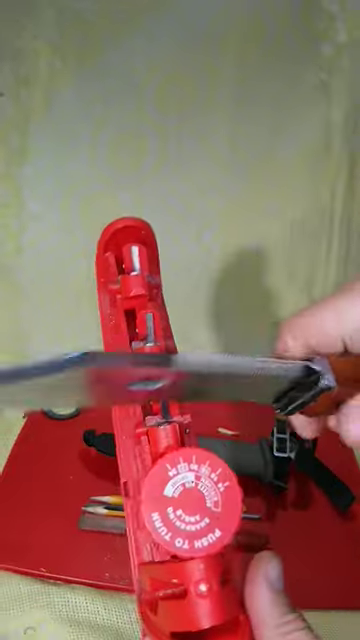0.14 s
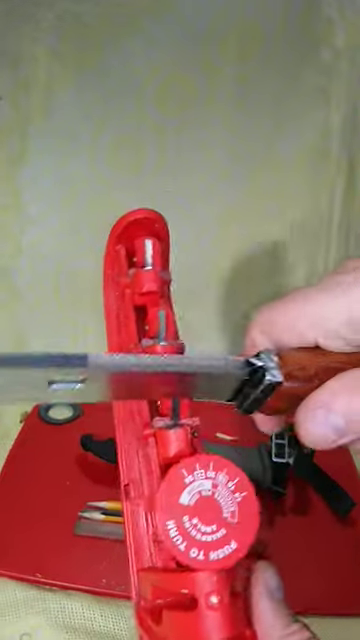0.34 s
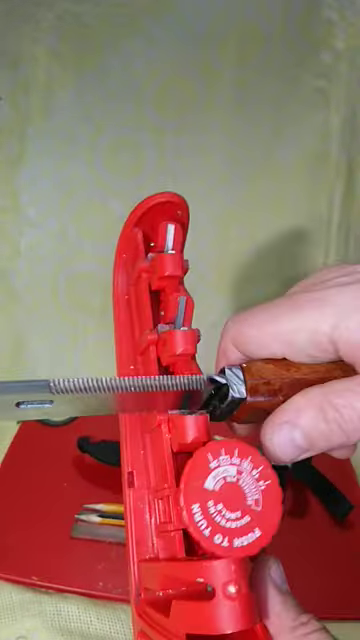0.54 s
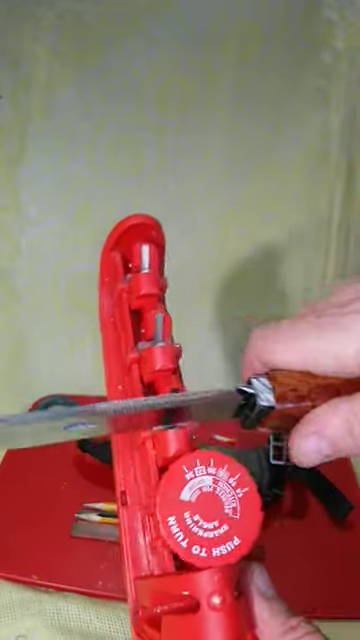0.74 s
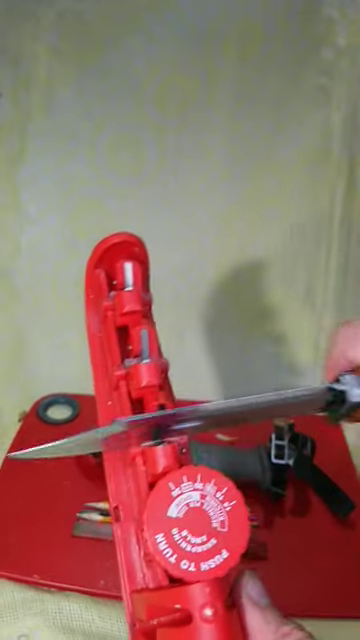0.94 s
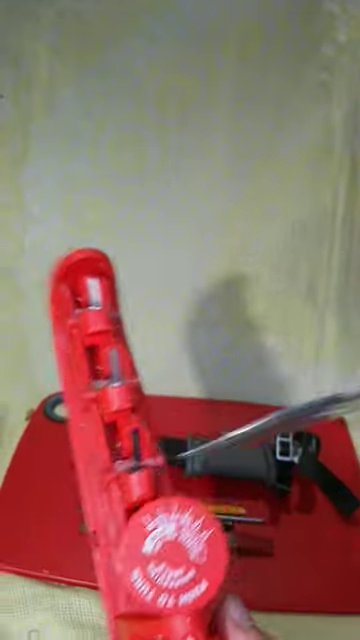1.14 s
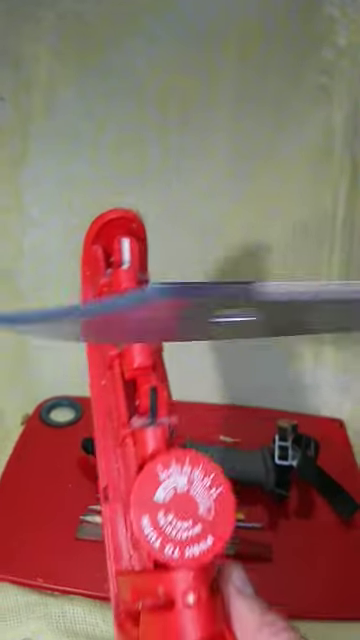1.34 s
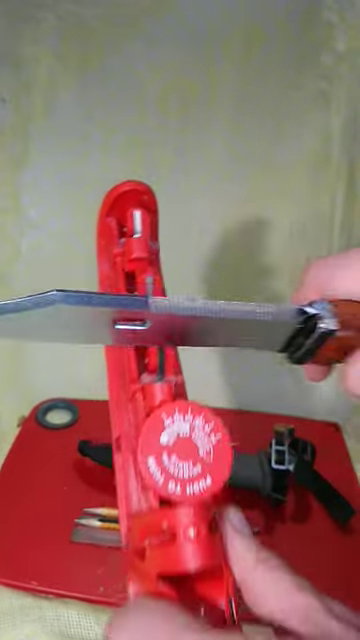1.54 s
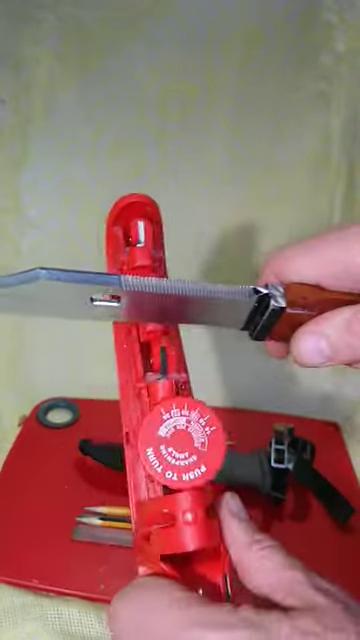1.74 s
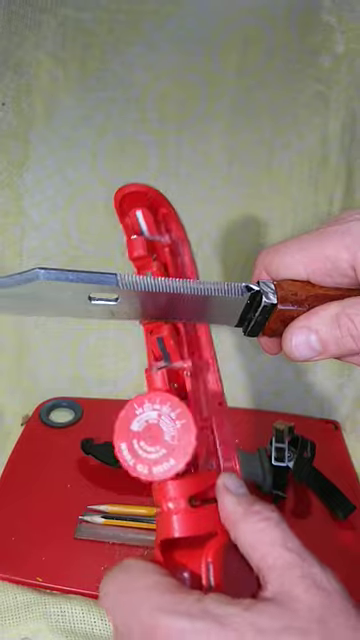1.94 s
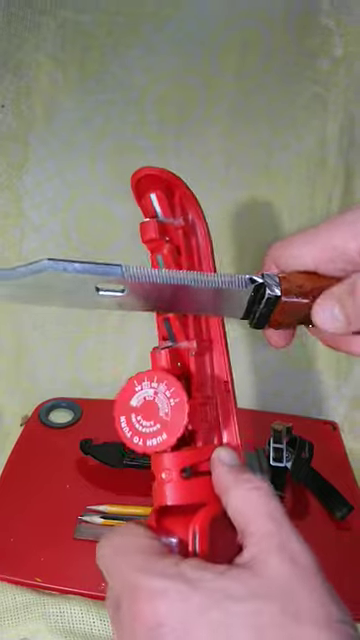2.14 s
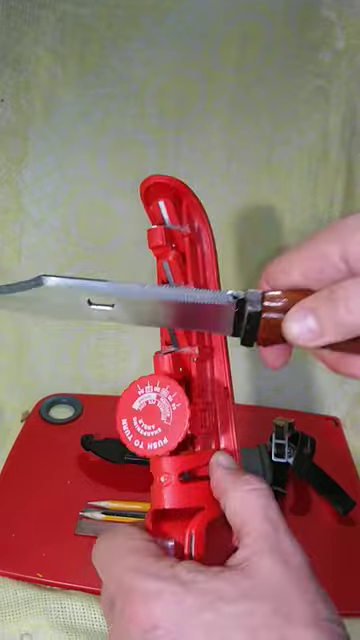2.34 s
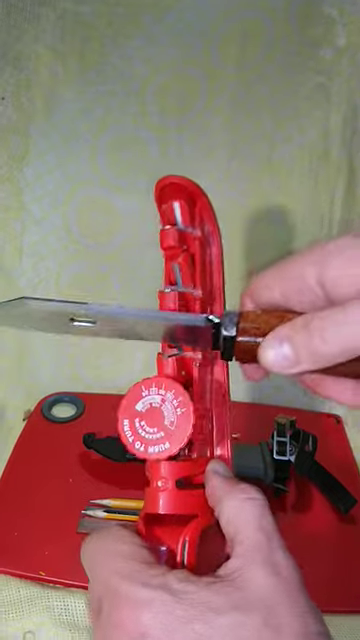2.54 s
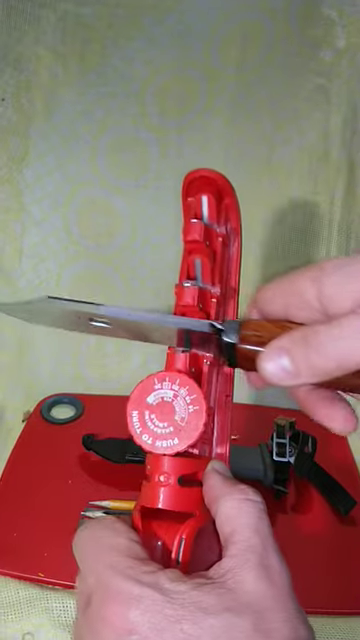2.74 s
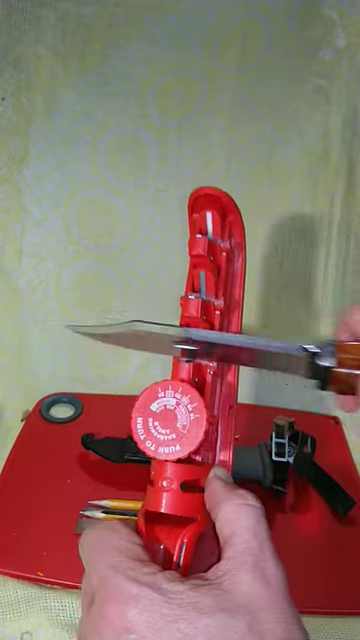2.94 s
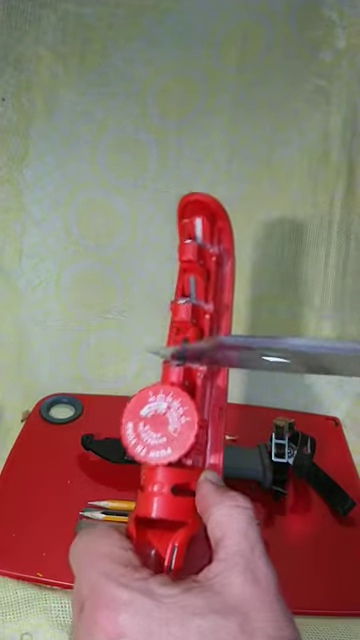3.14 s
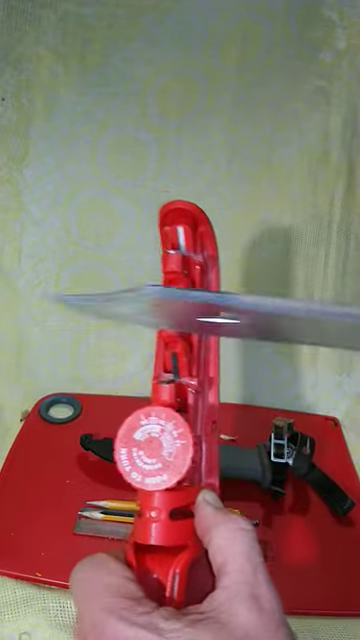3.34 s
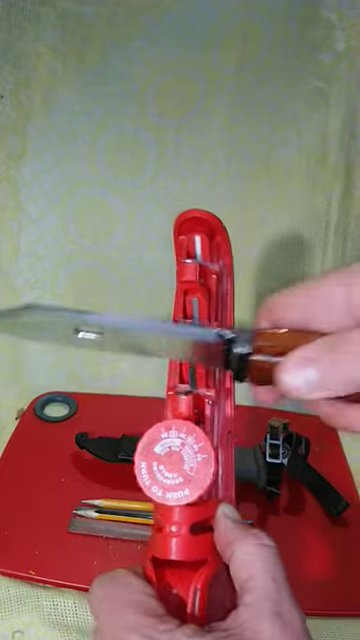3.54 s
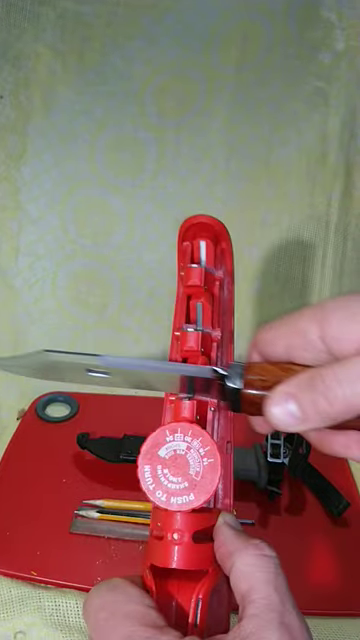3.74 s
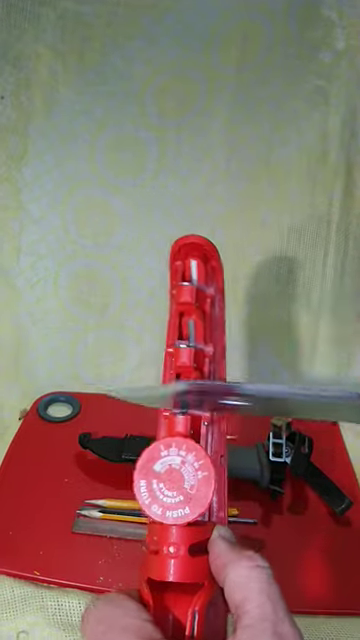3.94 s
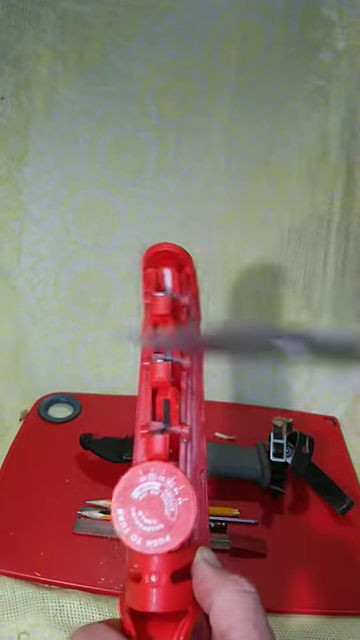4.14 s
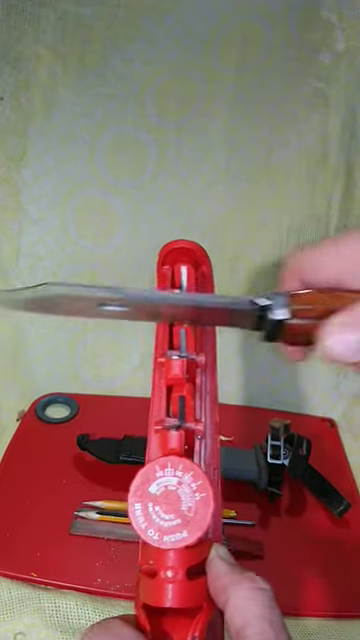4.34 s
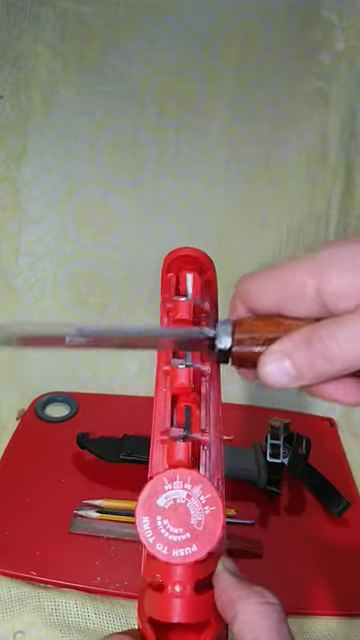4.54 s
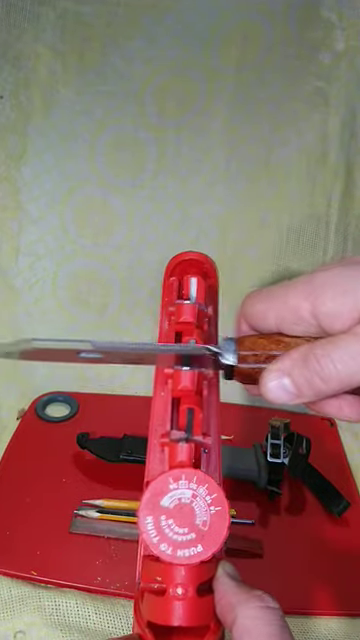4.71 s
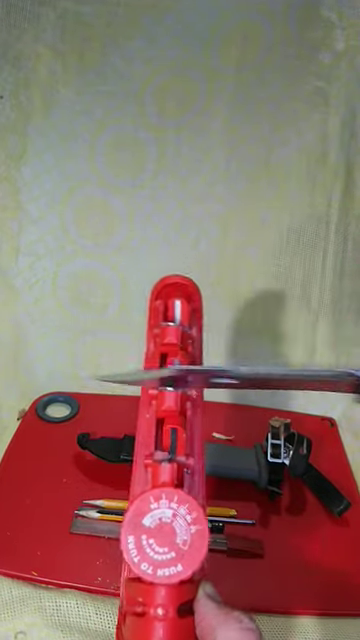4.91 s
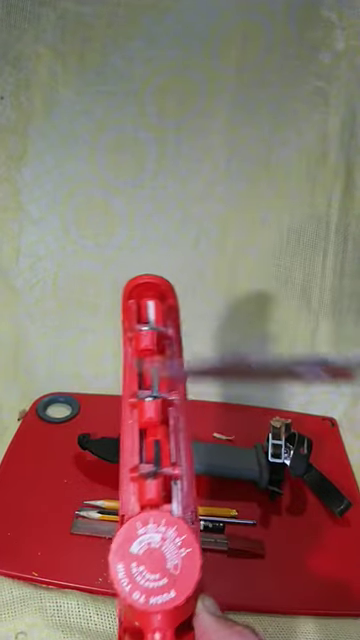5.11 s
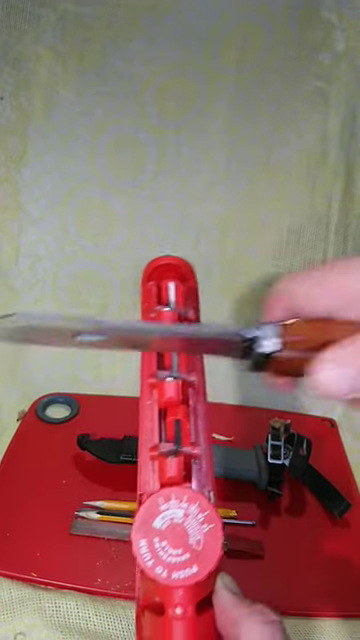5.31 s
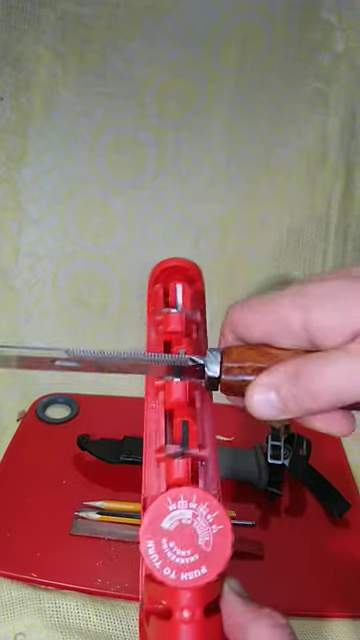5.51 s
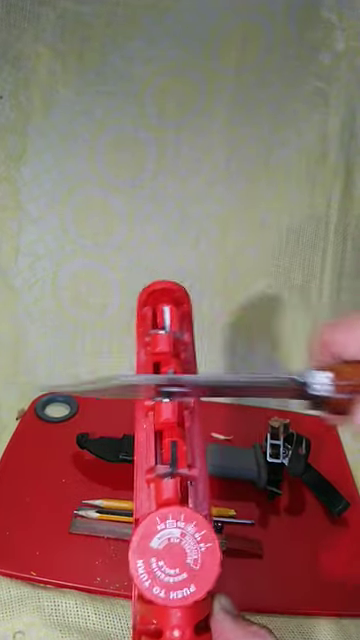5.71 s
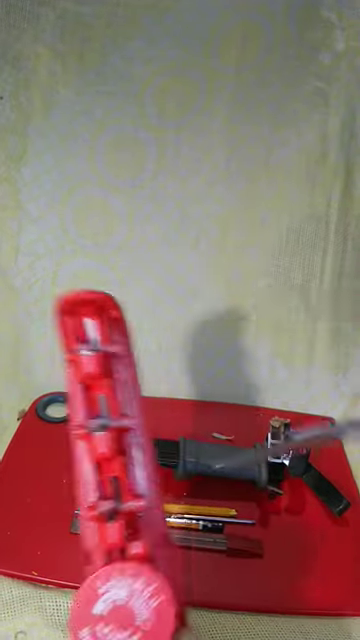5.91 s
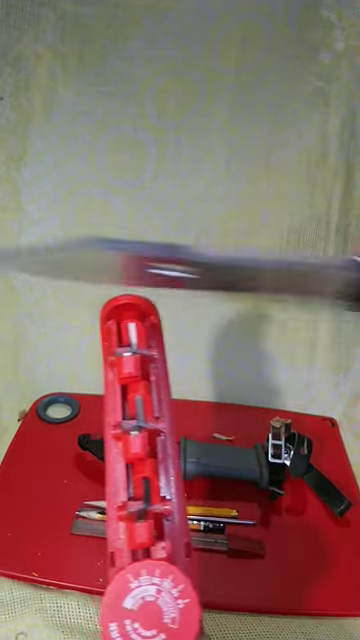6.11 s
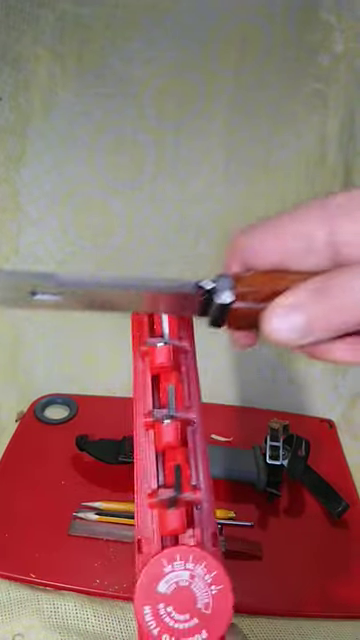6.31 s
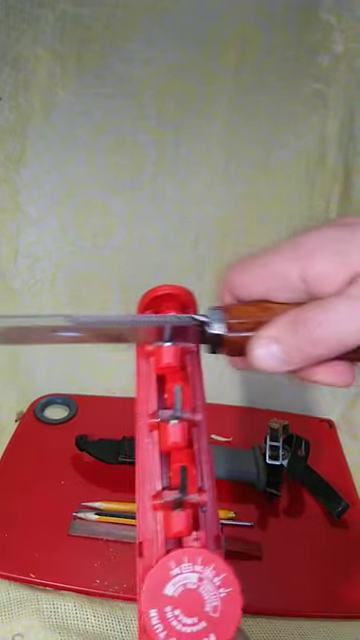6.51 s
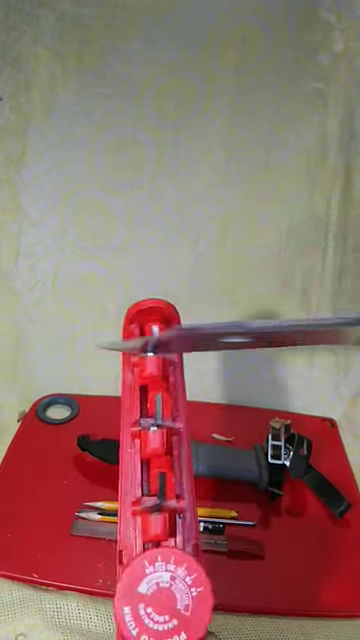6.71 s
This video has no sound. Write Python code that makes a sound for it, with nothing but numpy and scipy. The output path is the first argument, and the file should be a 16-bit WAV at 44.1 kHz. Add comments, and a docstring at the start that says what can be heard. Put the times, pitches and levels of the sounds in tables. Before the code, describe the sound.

A steel blade is pulled six times through a plastic sharpener, each stroke a bright knock then a short gritty rasp, in a quiet small room.

```python
'''A small room: over a table, a steel knife is pulled six times through a hand-held plastic sharpener.
Each time the blade knocks into a slot (crack and thud), then rasps under growing pressure: grainy noise
drives resonances of blade and housing. The edge catches with short squeaks; after four pulls the freed
blade rings faintly. Rattles, taps, rumbles, hum, air noise and a soft tick about once a second lie beneath.
Two microphone ports colour the contact sounds differently on left and right.'''
import sys
import numpy as np
from scipy import signal
from scipy.fft import rfft, irfft, next_fast_len
from scipy.io import wavfile
from scipy.ndimage import uniform_filter1d

SR = 44100
rng = np.random.default_rng(int(sys.argv[2]) if len(sys.argv) > 2 else 0)


def wav_record(signal):
    """Record a signal, one row per channel, as 16-bit PCM in the file named by sys.argv[1]."""
    frames = np.transpose(np.atleast_2d(signal))
    bounded = np.clip(frames, -1, 1)
    # unit amplitude maps onto the largest positive 16-bit level
    quanta = np.round(bounded * 32767).astype(np.int16)
    wavfile.write(sys.argv[1], SR, quanta)


N = 298116
TIME = np.arange(N) / SR

# pulls: (full bite t/s, tip reached t/s, attack/s, tip length/s, heel level/dB, near-tip level/dB,
#         chatter re rasp/dB, hiss re rasp before trim/dB)
PULLS = [ (0.705, 1.131, 0.053, 0.064, -38, -31.5, -10.5, -1),
         (2.809, 3.199, 0.03, 0.046, -37.5, -33.5, -9, -6),
         (3.794, 4.072, 0.064, 0.035, -42, -32, -3, -2.5), (4.761, 5.07, 0.022, 0.011, -39, -32, -1, -1),
         (5.66, 5.906, 0.011, 0.034, -39.5, -33.5, -4, -3.5),
         (6.559, 6.758, 0.017, .04, -39, -36, -1.5, -5), ]
# hand leans in or eases off, one row per pull: (t/s, pressure change/dB, length/s)
LEANS = [(0.816, -3.5, 0.024), (2.932, 3.5, 0.056), (3.887, 9, 0.062), (4.92, -2, 0.058),
         (5.718, -6, 0.015), (6.584, 1, .02)]
# spectrum of the landing or catching edge: (f/Hz, density/dB per Hz)
IMPACT = [(60, 1.5), (200, -18.5), (600, -18), (950, -14), (1250, 2.5), (1550, -3.5), (2100, 1.5),
          (3400, 5), (5200, -0.5), (7000, -5), (8200, -6.5), (12000, -34), (16000, -30.5)]
# left-right correlation of contact noise, clipped to +-1: (f/Hz, correlation)
CONTACT_LIKENESS = [(200, 0.5), (1300, 1.06), (2200, 0.72), (3000, -0.75), (4200, 1), (7000, 0)]


def from_db(db):
    """Decibels to gain."""
    return 10 ** (np.asarray(db) / 20)


def rms_one(x):
    """Scale to unit power."""
    return x / np.sqrt(np.mean(x ** 2) + 1e-20)


def at_hz(points, hz):
    """Interpolate a table on a log-frequency axis."""
    f, value = np.transpose(points)
    return np.interp(np.log(np.maximum(hz, 1)), np.log(f), value)


def panned(db):
    """Left and right gains, averaging 1, for a level difference."""
    gains = from_db(np.array([db, -db]) / 2).reshape(2, -1)
    return gains / gains.mean(axis=0)


def cut(x, hz, kind, order=2):
    """Butterworth filter."""
    return signal.sosfilt(signal.butter(order, hz, kind, fs=SR, output="sos"), x)


def resonate(x, hz, width_hz):
    """One two-pole resonance, gain about 1 on top."""
    r = np.exp(-np.pi * width_hz / SR)
    zeros = np.array([1, 0, -1]) * (1 - r * r) / 2
    poles = [1, -2 * r * np.cos(2 * np.pi * hz / SR), r * r]
    return signal.lfilter(zeros, poles, x)


def peaks(x, rows):
    """Chain of peaks and notches: (f/Hz, width/Hz, gain/dB)."""
    for hz, width_hz, db in rows:
        a, k = from_db(db / 2), np.pi * width_hz / SR
        c = -2 * np.cos(2 * np.pi * hz / SR)
        x = signal.lfilter([1 + k * a, c, 1 - k * a], [1 + k / a, c, 1 - k / a], x)
    return x


def colour(x, spectrum, size=2048):
    """Causal (minimum-phase) filter with the given spectrum and unit power gain."""
    magnitude = from_db(at_hz(spectrum, np.fft.rfftfreq(size, 1 / SR)))
    cepstrum = irfft(np.log(magnitude))
    folded = np.r_[cepstrum[0], 2 * cepstrum[1:size // 2]]
    response = irfft(np.exp(rfft(folded, size)))
    response = response[None] / np.linalg.norm(response)
    return signal.oaconvolve(x, response, axes=1)[:, :x.shape[1]]


def drift(per_s):
    """Random walk between per_s independent points a second, unit power."""
    return rms_one(np.interp(TIME * per_s, np.arange(N), rng.standard_normal(N)))


def noise_pair(likeness, count=N):
    """White stereo noise with the tabled left-right correlation."""
    size = next_fast_len(count, True)
    alike = np.clip(at_hz(likeness, np.fft.rfftfreq(size, 1 / SR)), -1, 1)
    mid, side = rfft(rng.standard_normal((2, size)))
    mid = mid * np.sqrt((1 + alike) / 2)
    side = side * np.sqrt((1 - alike) / 2)
    return irfft(np.array([mid + side, mid - side]), size)[:, :count]


def add(out, s, sound):
    """Mix a short sound in at time s."""
    i = int(s * SR)
    out[:, i:i + sound.shape[1]] += sound[:, :N - i]


def swells(rows):
    """Sum of Gaussian level bumps: (t/s, level/dB, length/s)."""
    return sum(from_db(db) * np.exp(-((TIME - s) / length) ** 2) for s, db, length in rows)


def pressure_db(t, pull, lean):
    """The edge bites, bears down harder from heel to tip, then the tip slides out lightly and lifts off."""
    bite_rise_db = 23
    tip_drop_s, tip_drop_db, tip_fade_db = 0.018, 10.5, 6
    bite_s, tip_s, attack_s, length_s, heel_db, tip_db = pull[:6]
    lean_s, lean_db, lean_length_s = lean
    hold = np.interp(t, [bite_s, tip_s], [heel_db, tip_db])
    hold = hold + lean_db * np.exp(-((t - lean_s) / lean_length_s) ** 2)
    attack = bite_rise_db * np.maximum(bite_s - t, 0) / attack_s
    drop = tip_drop_db * np.clip((t - tip_s) / tip_drop_s, 0, 1)
    fade = tip_fade_db * np.clip((t - tip_s) / length_s, 0, 1)
    lift = LIFT_DB * np.maximum(t - tip_s - length_s, 0) / LIFT_S
    return hold - attack - drop - fade - lift


LIFT_S, LIFT_DB = 0.011, 34


def grit(per_s, spread_db, bed, judder_db):
    """Friction force: abrasive grains of uneven size snap past the edge, in clumps as the blade judders."""
    sizes = from_db(spread_db * np.minimum(rng.exponential(1, N), 4))
    hits = sizes ** 2 * (rng.random(N) < per_s / SR)
    snaps = signal.lfilter([1], [1, -.93], hits)
    power = snaps / snaps.mean() + bed
    judder = from_db(judder_db * drift(110))
    return rms_one(noise_pair(CONTACT_LIKENESS) * np.sqrt(power) * judder)


def scraping():
    """Friction drives blade and housing; pressing harder adds chatter of the edge and hiss."""
    # sliding edge: (f/Hz, density/dB per Hz)
    slide_spectrum = [(60, -15.5), (200, -18.5), (400, -13), (950, -15.5), (1500, -6), (2000, 1.5),
                      (3000, 5.5), (4600, -1), (6000, -5), (7200, -7.5), (8100, -11.5), (8600, -12.5),
                      (11500, -29), (16000, -24.5)]
    # blade and housing modes in contact: (f/Hz, width/Hz, level before trim/dB)
    body_modes = [(371, 110, 0.5), (716, 130, -3), (1215, 53, 3.5), (1254, 170, 4.5), (1610, 130, -2),
                  (1960, 280, -4.5), (2190, 70, -3.5), (2525, 160, -13.5), (3052, 150, 3.5),
                  (3260, 90, -3.5), (4560, 190, -19), (4985, 98, -2.5), (5700, 151, 0.5), (6660, 670, 0.5)]
    # blade's seat, one row per pull: (chatter f/Hz, slot f/Hz, slot/dB, handle boom/dB, shell hollow/dB,
    #                                  blade flexing/dB, finest grit/dB, left-right/dB)
    seats = [(3800, 3280, 3.5, 11, 4, 9, 1.5, 0), (4000, 3700, 3.5, 6, 1, 2.5, 4, 1),
             (3590, 2500, 8, 6, 2, 6, -0.5, 1), (3930, 2650, 6, -3.5, 6, 4.5, 8, 0.5),
             (3940, 3800, 2.5, -2.5, 4, 2, 8.5, 0.5), (4160, 2460, 7, -13, 13.5, 5.5, 3, -2)]
    mode_trim_db, hiss_trim_db = -3.5, 1.5
    chatter_per_db, hiss_per_db = .5, 0.45  # extra dB per dB of pressure above the heel-tip mean
    housing_hz, housing_db, housing_peak_share = 902, 0.5, 0.98  # low voice fullest late in the pull

    force = grit(per_s=1600, spread_db=-1.5, bed=1.0, judder_db=1.5)
    plain = colour(force, slide_spectrum)
    rough = plain
    # contact point travels along the blade: each mode swells and fades on its own
    for hz, width_hz, db in body_modes:
        mode_gain = from_db(db + mode_trim_db + 4.75 * drift(35))
        rough = rough + mode_gain * resonate(plain, hz, width_hz)
    rasp = rms_one(cut(rough, 3610, "low", order=6))
    hiss = rms_one(cut(rough, 4250, "high", order=6))
    # low-passed forwards and backwards: stays in phase with the rasp
    housing = cut(cut(rasp, housing_hz, "low")[:, ::-1], housing_hz, "low")[:, ::-1]
    slips = rng.standard_normal((2, N)) * np.abs(force) * from_db(1.5 * drift(60))

    out = np.zeros((2, N))
    for pull, lean, seat in zip(PULLS, LEANS, seats):
        bite_s, tip_s, attack_s, length_s, heel_db, tip_db, chatter_db, hiss_db = pull
        chatter_hz, slot_hz, slot_db, boom_db, hollow_db, flex_db, fine_db, pan_db = seat
        span = (TIME > bite_s - attack_s) & (TIME < tip_s + length_s + LIFT_S)
        t = TIME[span]
        rasp_db = pressure_db(t, pull, lean)
        extra_db = pressure_db(np.clip(t, bite_s, tip_s), pull, lean) - (heel_db + tip_db) / 2
        travel = np.clip((t - bite_s) / (tip_s - bite_s), 0, 1)
        low = from_db(housing_db - 6 * (travel - housing_peak_share) ** 2) - 1
        chatter = resonate(slips[:, span], chatter_hz, 800)
        chatter = rms_one(resonate(chatter, chatter_hz, 1000))
        sound = rasp[:, span] + low * housing[:, span]
        sound = sound + from_db(chatter_db + chatter_per_db * extra_db) * chatter
        sound = sound + from_db(hiss_db + hiss_trim_db + hiss_per_db * extra_db) * hiss[:, span]
        seat_peaks = [(slot_hz, 400, slot_db), (365, 130, boom_db), (760, 450, hollow_db),
                      (1250, 130, flex_db), (12000, 7000, fine_db)]
        add(out, t[0], peaks(sound * from_db(rasp_db), seat_peaks) * panned(pan_db))
    return out


def crunch(t60, hold=0.0023, count=4096):
    """One contact: a cluster of tiny collisions, as a noise burst that holds briefly and dies away."""
    t = TIME[:count]
    rise = np.minimum(t / 0.00145, 1)
    decay = np.exp(-np.log(1000) * np.maximum(t - hold, 0) / t60)
    return noise_pair(CONTACT_LIKENESS, count) * rise * decay


def attack_one(x, size=176):
    """Scale so that the loudest 4 ms have unit power."""
    return x / np.sqrt(uniform_filter1d(np.mean(x ** 2, axis=0), size).max())


def knocks():
    """The edge lands on the abrasive with a bright crack and pushes the housing once, with a thud."""
    # drops into a slot: (t/s, level before trim/dB, ring f/Hz, ring/dB, thud re crack before trim/dB,
    #                     left-right/dB, t60/s)
    drops = [(0.6034, -27, 1910, 18, -18.5, 22, 0.059), (0.61, -16.5, 3100, -3, -16.5, -2, 0.024),
             (2.6609, -20, 3930, 0.5, -26, -2.5, 0.045), (2.6704, -18, 2070, 10, -13.5, 3.5, 0.039),
             (3.7357, -15, 1980, 3.5, -20, -1, 0.033), (4.647, -11.5, 4000, 1.5, -25.5, -0.5, 0.014),
             (5.519, -24.5, 3850, -1, -23.5, -3.5, 0.077), (5.538, -23.5, 3900, 0, -28, 1, 0.12),
             (5.5554, -9.5, 4140, 8, -25.5, 4.5, 0.015), (6.4645, -12, 4210, 14.5, -35.5, 1, 0.019),
             (6.4758, -20.5, 4080, 0, -18, 5, 0.045)]
    # housing's answer to a blow: (f/Hz, density/dB per Hz)
    thud_spectrum = [(50, -3), (170, 6.5), (400, 9), (700, 7.5), (950, 5.5), (1250, 0.5), (1600, -1.5),
                     (2600, -40.5)]
    knock_trim_db, thud_trim_db = -6.5, 5.5
    out = np.zeros((2, N))
    thud = attack_one(colour(signal.unit_impulse(4096, 30)[None], thud_spectrum))
    for s, db, ring_hz, ring_db, thud_db, pan_db, t60 in drops:
        crack = cut(colour(crunch(t60), IMPACT), 1110, "high", order=3)
        crack = attack_one(peaks(crack, [(ring_hz, 800, ring_db)]))
        knock = crack + from_db(thud_db + thud_trim_db) * thud
        add(out, s, from_db(db + knock_trim_db) * knock * panned(pan_db))
    return out


def catches():
    """The edge sticks, then lets go with a brief squeak; bite and chance snags scale with the pressure."""
    # hardest catches: (t/s, level before trim/dB)
    hard_catches = [(1.098, -25), (2.925, -22), (3.894, -10.5), (3.92, -24), (3.947, -23), (4.059, -12),
                    (4.967, -26), (5.049, -13.5), (5.8952, -11.5)]
    snags_per_pull, trim_db = 4, -11.5
    bite_snag_db, snag_db, snag_spread_db = 10, -2, 5  # re pressure level, before trim
    out, events = np.zeros((2, N)), list(hard_catches)
    for pull, lean in zip(PULLS, LEANS):
        events.append((pull[0], pressure_db(pull[0], pull, lean) + bite_snag_db))
        for s in rng.uniform(pull[0], pull[1], snags_per_pull):
            chance_db = snag_db + snag_spread_db * rng.standard_normal()
            events.append((s, pressure_db(s, pull, lean) + chance_db))
    for s, db in events:
        squeak = colour(crunch(t60=.026, hold=0.0041), IMPACT)
        squeak = peaks(squeak, [(3860, 480, 14.3)])
        add(out, min(s, TIME[-1]), from_db(db + trim_db) * attack_one(squeak))
    return out


def blade_ring():
    """Out of the slot nothing damps the steel: decaying sines at its free modes."""
    # blade springs free: (t/s, level/dB)
    releases = [(3.21, -66), (4.075, -47.5), (5.078, -56.5), (5.905, -55.5)]
    # free-blade modes: (f/Hz, level/dB, t60/s)
    blade_modes = [(1290, -13, .35), (2030, -20, .4), (2750, -12, .2), (3440, -13, .26), (3548, 0, .32),
                   (5475, -15, .15)]
    out, t = np.zeros((2, N)), TIME[:SR // 2]
    ring = 0
    for hz, db, t60 in blade_modes:
        ring = ring + from_db(db) * np.sin(2 * np.pi * hz * t) * np.exp(-np.log(1000) * t / t60)
    for s, db in releases:
        add(out, s, from_db(db) * ring[None])
    return out


def ticks():
    """Small contacts (knife rattles, plastic taps, a steady tick) ring briefly in the modes touched."""
    # knife rattles lightly in its handle: (t/s, level before trim/dB)
    rattles = [(1.575, -57), (1.968, -61), (2.077, -51), (2.784, -48), (3.213, -31), (4.216, -53),
               (5.984, -52)]
    # rattle modes: (f/Hz, width/Hz, level/dB)
    handle_modes = [(1980, 260, 2.5), (2480, 200, -3.5), (3970, 220, -4)]
    # dull taps of the settling plastic: (t/s, level before trim/dB, ring f/Hz)
    taps = [(1.188, -42, 585), (1.196, -40.5, 1280), (2.512, -54, 486), (3.234, -50.5, 670),
            (5.924, -40, 584)]
    trim_db = -5.0
    out = np.zeros((2, N))
    events = [(s, db, handle_modes) for s, db in rattles]
    events += [(s, db, [(hz, 190, 0)]) for s, db, hz in taps]
    # faint steady tick, perhaps a clock
    for s in np.arange(1.425, TIME[-1], .9935):
        events.append((s, -55.5, [(4950, 210, 0)]))
    for s, db, modes in events:
        touch = crunch(t60=.014)
        ring = 0
        for hz, width_hz, mode_db in modes:
            mode = resonate(resonate(touch, hz, width_hz), hz, 3 * width_hz)
            ring = ring + from_db(mode_db) * mode
        add(out, s, from_db(db + trim_db) * attack_one(ring))
    return out


def handling():
    """Dull rumbles of the table, and skin brushing over the plastic handle: band noise in swells."""
    # sharpener nudges the table: (t/s, level/dB, length/s)
    nudges = [(1.10, -49, 0.039), (1.18, -56, 0.056), (2.604, -56.5, 0.1), (3.23, -53.5, 0.027),
              (4.1, -55, 0.034)]
    # hand shifts its grip: (t/s, level/dB, length/s)
    grips = [(1.69, -66, 0.047)]
    rumble = rms_one(cut(rng.standard_normal(N), [48, 85], "band", order=3))
    brush = rms_one(cut(noise_pair(CONTACT_LIKENESS), [600, 3800], "band"))
    return swells(nudges) * rumble + swells(grips) * brush


def background():
    """Steady room noise; sines of mains hum, a far motor and a thin whine, wavering in phase."""
    # room noise: (f/Hz, density/dB per Hz)
    air_spectrum = [(25, -17.5), (38, -7.5), (52, 2), (80, -11), (140, -10.5), (220, -25.5), (350, -21),
                    (480, -29), (1000, -27), (2200, -29), (4600, -29), (7300, -34), (8200, -39),
                    (16000, -39.5)]
    # its left-right correlation: (f/Hz, correlation)
    air_likeness = [(50, 1), (110, 0.76), (250, 0.093), (1000, 0), (4000, 0)]
    # its balance: (f/Hz, left-right/dB)
    air_balance = [(60, 4.5), (110, -5.5), (200, 13), (380, 12), (700, 3), (1300, 0.5), (2400, 1),
                   (4400, -8.5), (8100, 9), (15000, -1)]
    # hum and whine: (f/Hz, rms level/dB, left-right/dB)
    hum_lines = [(50.0, -62, -2), (120.5, -72.5, 6), (150, -67, 27.5), (200.3, -71.5, 37.5),
                 (248.7, -76.5, 19), (296, -80, 19.5), (350, -83, 13), (4800, -85.5, -1.5)]
    air_db = -59.5
    hz = np.fft.rfftfreq(N, 1 / SR)
    shape = from_db(at_hz(air_spectrum, hz)) * panned(at_hz(air_balance, hz))
    air = rms_one(irfft(rfft(noise_pair(air_likeness)) * shape, N))
    hum = 0
    for f, db, pan_db in hum_lines:
        tone = np.sqrt(2) * np.sin(2 * np.pi * f * TIME + 0.23 * drift(9.1))
        hum = hum + from_db(db) * tone * panned(pan_db)
    return from_db(air_db) * air + hum


def room(x, t60, wet_db, near_t60, near_db, wall_hz):
    """Quick reflections off table and wall plus a longer tail: decaying low-passed noise responses."""
    t, response = TIME[:SR // 2], 0
    for decay, db in ((t60, wet_db), (near_t60, near_db)):
        echoes = rng.standard_normal((2, len(t))) * np.exp(-np.log(1000) * t / decay) * (t > .003)
        echoes = cut(echoes, min(wall_hz, .45 * SR), "low")
        energy = np.sum(echoes ** 2) / 2 * SR / (2 * wall_hz)
        response = response + from_db(db) * echoes / np.sqrt(energy)
    return x + signal.fftconvolve(x, response, axes=1)[:, :N]


def scene():
    """Contacts sound through the room and the two ports; handling and background join unfiltered."""
    # microphone port resonances and notches: (f/Hz, width/Hz, gain/dB)
    left_port = [(4340, 650, -8), (3530, 1500, -3.5), (8035, 510, -19.5)]
    right_port = [(1510, 160, -4), (1995, 306, 6), (3910, 1220, 9), (6790, 540, -9), (8190, 980, -29.5)]
    contacts = scraping() + knocks() + catches() + ticks() + blade_ring()
    left, right = room(contacts, t60=0.15, wet_db=-12.5, near_t60=0.039, near_db=-11, wall_hz=11900)
    ported = np.array([peaks(left, left_port), peaks(right, right_port)])
    return ported + handling() + background()


def record(dry):
    """The deepest rumble is dropped, the loudest peaks are rounded and the top is cut."""
    rounded = np.tanh(cut(dry, 35.9, "high", order=6))
    top_cut = signal.ellip(12, .1, 70, 15950, fs=SR, output="sos")
    return signal.sosfilt(top_cut, rounded)


dry = scene()
out = record(dry)
wav_record(out)
```